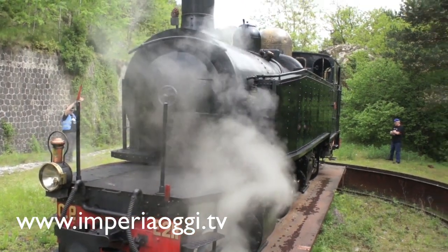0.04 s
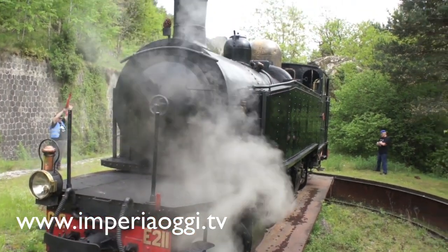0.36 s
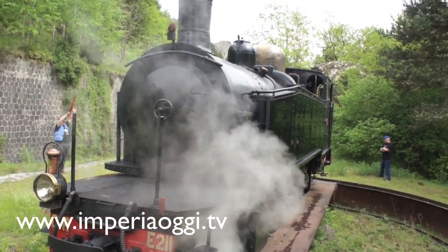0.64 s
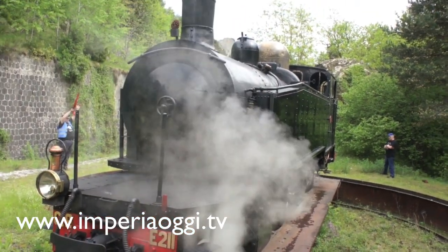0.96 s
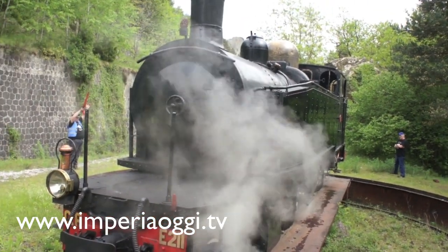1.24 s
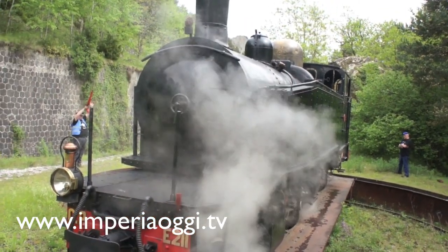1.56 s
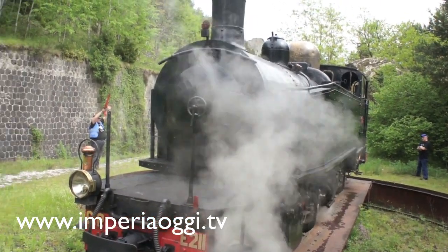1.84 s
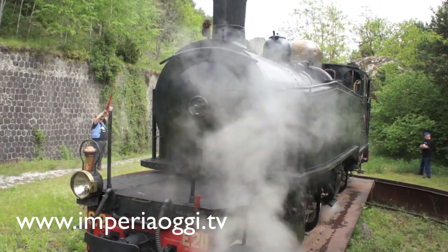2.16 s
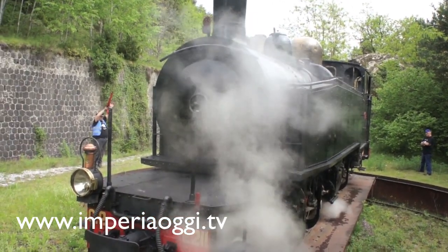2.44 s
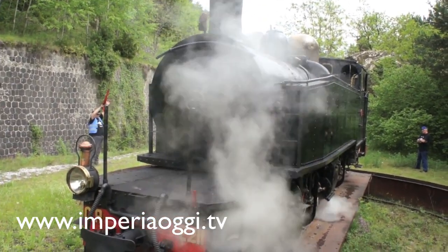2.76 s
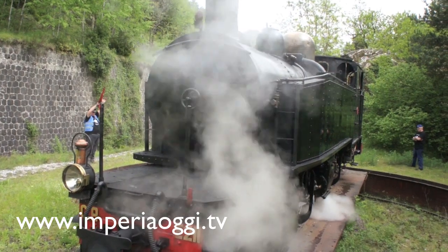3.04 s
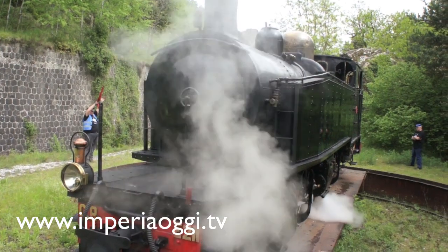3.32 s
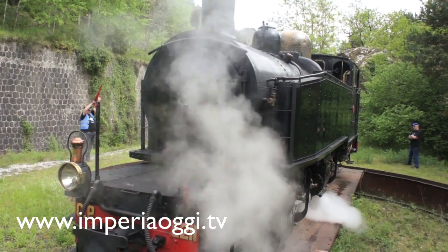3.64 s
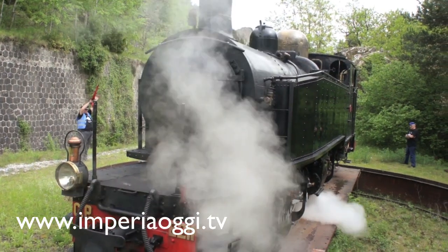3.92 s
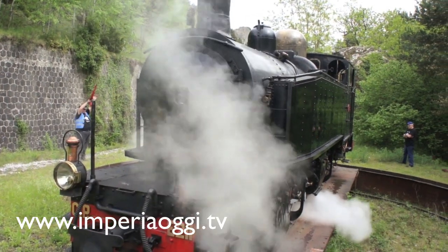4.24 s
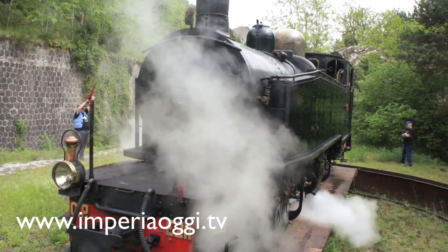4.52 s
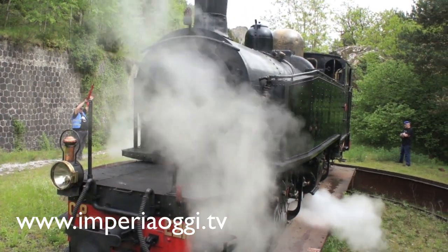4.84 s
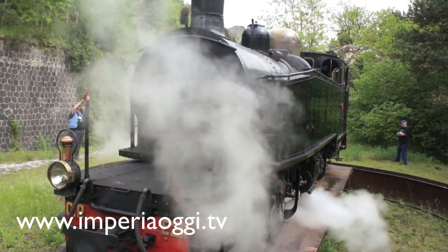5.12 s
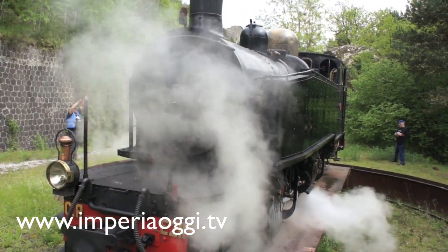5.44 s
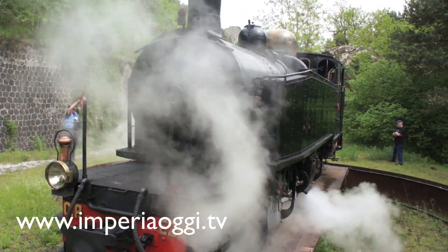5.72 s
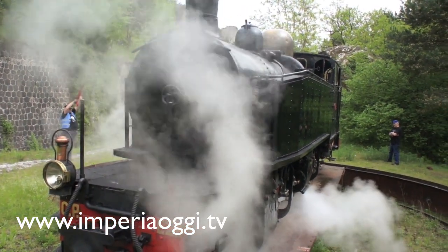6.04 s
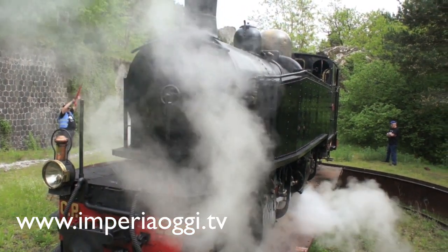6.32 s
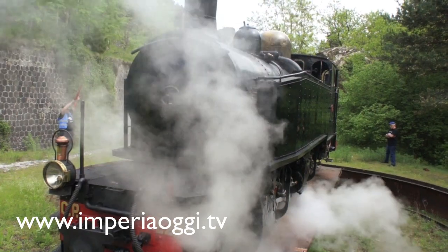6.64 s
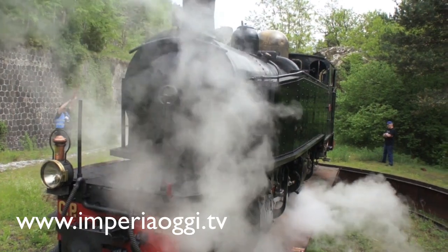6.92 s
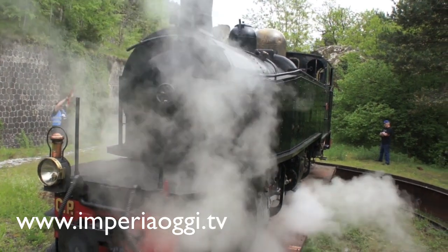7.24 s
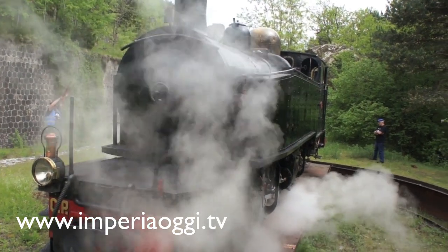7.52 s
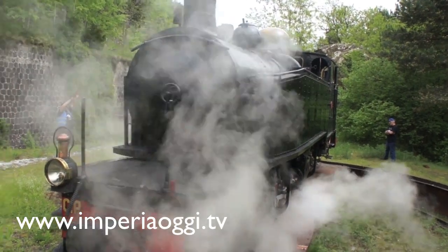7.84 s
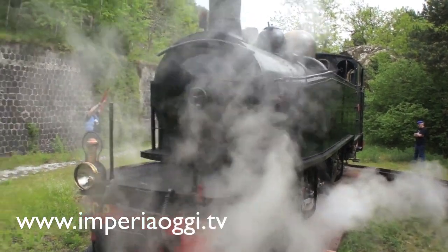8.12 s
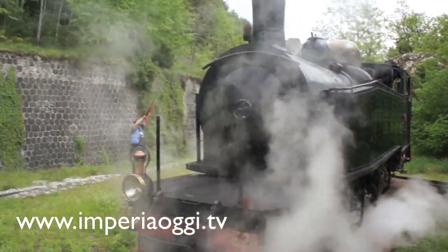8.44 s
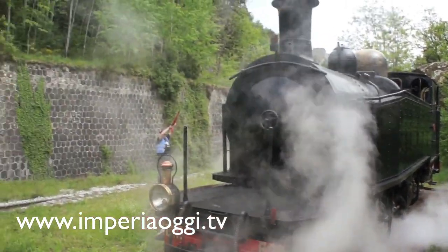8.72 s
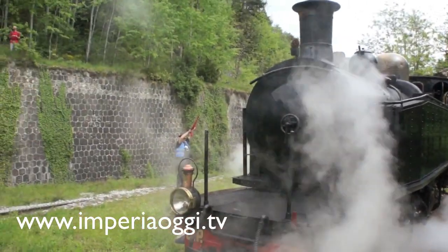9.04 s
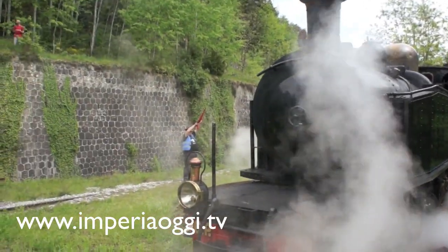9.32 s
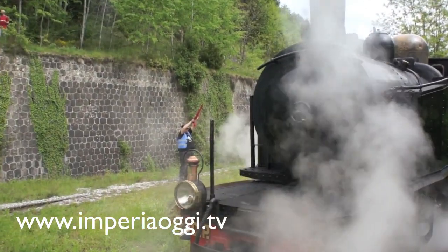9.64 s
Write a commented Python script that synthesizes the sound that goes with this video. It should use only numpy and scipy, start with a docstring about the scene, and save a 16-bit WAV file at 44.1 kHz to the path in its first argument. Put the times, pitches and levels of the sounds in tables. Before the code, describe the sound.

A steam locomotive roars steadily, then releases a loud, uneven hiss of steam that falters, surges again and eases off.

```python
"""A steady roar comes first: the blower in the chimney of a steam locomotive, on a turntable a few metres off.
A drain cock opens and its jet hisses over everything, hollowed by a reflection off the deck that shifts
as the jet swings. The jet falters, there is a low thump, it blows again brighter and then eases off.
While it is strong, the microphones are buffeted and the camera's gain control ducks the roar."""
import sys
import numpy as np
from scipy import signal
from scipy.fft import rfft, irfft, next_fast_len
from scipy.io import wavfile
from scipy.ndimage import uniform_filter1d, map_coordinates

SR = 44100
rng = np.random.default_rng(int(sys.argv[2]) if len(sys.argv) > 2 else 0)


def store_pcm(level_fs):
    """Save levels as 16-bit WAV."""
    pcm = np.round(np.clip(level_fs, -1, 1) * 32767).astype(np.int16)
    wavfile.write(sys.argv[1], SR, np.atleast_2d(pcm).T)


N = 426888
TIME = np.arange(N) / SR


# The jet from a few metres, hiss and sizzle. Each row: frequency in Hz, relative level in dB.
HISS_SPECTRUM = [(150, -42), (550, -38.5), (1100, -23.5), (2000, -14), (2800, -16), (3500, -6.5),
                 (4300, -3), (5300, -1.5), (6100, -2), (6800, 1), (8000, -2.5), (10000, -14.5),
                 (15000, -44)]
SIZZLE_SPECTRUM = [(3000, -47), (5500, -10), (7300, -5), (8500, -1.5), (9700, -3), (10900, -3), (12000, -7),
                   (13500, -12.5), (15500, -27)]
# Resonances around the cock. Each row: centre in Hz, width in Hz, boost or dip in dB.
COCK_MODES = [(372, 26, 4), (577, 160, 16.5), (2110, 240, 1.5), (2670, 260, 1.5), (4500, 270, -2),
              (4800, 300, -1.5)]
# The jet across the microphone pair. Each row: frequency in Hz, left-right likeness from 0 to 1.
JET_LIKENESS = [(300, 0.65), (2000, 1), (4000, .96), (8500, 1), (10800, 0.99), (12000, 0.74), (14000, .5)]

def drain_jet(hiss_db, sizzle_db):
    """Wet steam leaves the cock in an uneven stream: a hiss with a brighter sizzle on top."""
    sputter_db = 0.092 * wobble(16) + 0.34 * wobble(70)  # slugs of condensate
    flow = rush(HISS_SPECTRUM, JET_LIKENESS, patchy_db=0.6)
    hiss = unit(filtered(flow, lambda hz: resonances(COCK_MODES, hz)))
    sizzle = amp(sizzle_db + 0.6 * wobble(20)) * rush(SIZZLE_SPECTRUM, JET_LIKENESS, patchy_db=0.5)
    return amp(hiss_db + sputter_db) * (hiss + sizzle)


# The jet's bounce off the turntable deck. Each row: time in seconds, delay in ms, strength from 0 to 1.
DECK_BOUNCE = [(2.6, .57, .43), (4.1, 0.604, 0.29), (6.05, 0.55, .27), (7.2, 0.51, 0.14), (8.3, 0.4, 0)]

def off_the_deck(x):
    """The direct sound and its slightly later reflection make a slowly sliding comb."""
    delay_ms, strength = curves(DECK_BOUNCE)
    earlier = np.arange(N) - delay_ms * SR / 1000
    deck_tone = [(2000, 1), (7000, 1.5), (12000, -3.5)]  # Hz, dB: the rough deck scatters treble
    mirrored = filtered(x, lambda hz: amp(along(deck_tone, hz)))
    echo = np.array([map_coordinates(side, [earlier]) for side in mirrored])
    return (x + strength * echo) / np.sqrt(1 + strength ** 2)


# The jet, off axis at the microphones. Each row: frequency in Hz, left's lead in radians.
JET_PHASE = [(400, .35), (1800, 0), (9300, 0), (10800, -.3), (12300, -1.1), (14000, -1.3)]
# Its shading between them. Each row: frequency in Hz, left over right in dB.
JET_BALANCE = [(300, .5), (1300, -3), (2300, 1.5), (3400, -2.5), (4400, -1.5), (5400, -2.5), (6200, 0),
               (9200, 1), (10600, 3.5), (11800, 4.8), (13800, 1.5)]

def shaded(x, depth):
    """The camera's body delays and favours one microphone or the other, band by band."""
    bent = filtered(x, lambda hz: np.exp(np.array([[1j], [-1j]]) * along(JET_PHASE, hz) / 2))
    return bent + depth * filtered(bent, lambda hz: panned(along(JET_BALANCE, hz)) - 1)


# The nozzle, near centre, and the pipe, to the right. Each row: centre in Hz, width in Hz, level in dB.
NOZZLE_BANDS = [(4150, 220, -3), (4390, 360, 0)]
PIPE_BANDS = [(2090, 670, -1.5), (3350, 310, 1), (3840, 460, 4)]
# When each sings. Each row: start, end and fade in seconds, level in dB relative to the hiss.
NOZZLE_SPELLS = [(2.28, 3.35, .15, -12), (4.95, 8.55, 0.26, -11), (7.32, 7.48, 0.054, -11),
                 (7.58, 7.72, .05, -13)]
PIPE_SPELLS = [(8.75, 10.5, 0.67, -8)]

def drain_ringing():
    """The jet rings its nozzle; the drain pipe adds a hollow note as the flow eases."""
    nozzle = panned(db=.3) * blown(NOZZLE_BANDS, NOZZLE_SPELLS, flutter_db=1.1)
    pipe = panned(db=-6) * blown(PIPE_BANDS, PIPE_SPELLS, flutter_db=1.5)
    return nozzle + pipe


def blown(modes, spells, flutter_db):
    """Steam blows across narrow resonances and makes them sing hoarsely, in spells that fade in and out."""
    def bands(hz):
        return sum(amp(db) * np.exp(-2 * ((hz - centre) / width) ** 2) for centre, width, db in modes)
    level = sum(amp(db) * np.clip(np.minimum(TIME - start, end - TIME) / fade, 0, 1)
                for start, end, fade, db in spells)
    return level * amp(flutter_db * wobble(16)) * unit(filtered(rng.standard_normal(N), bands))


# The chimney's roar from a few metres. Each row: frequency in Hz, relative level in dB.
ROAR_SPECTRUM = [(15, -52), (25, -21), (86, -17.5), (156, -8), (359, -7), (410, -7.5), (482, -3),
                 (1450, -4.5), (2010, -3.5), (4040, -1.5), (4500, 0), (6920, 0.5), (10100, 0.5),
                 (13900, -7), (15500, -30)]
# The roar across the microphone pair. Each row: frequency in Hz, left-right likeness from 0 to 1.
ROAR_LIKENESS = [(100, 0.82), (1000, 0.92), (4000, 0.92), (6500, 0.98), (9000, 0.78), (11000, 0.4),
                 (14000, 0)]
# Resonances in chimney and smokebox. Each row: centre in Hz, width in Hz, boost in dB.
CHIMNEY_MODES = [(183, 110, 2), (248, 34, 2.5), (367, 28, 5), (473, 68, 2.5), (666, 77, 2.5), (900, 19, 0),
                 (1086, 34, 2.5), (2012, 55, 5.5), (2830, 120, 3), (4570, 100, 1.5), (8200, 780, 1),
                 (10050, 390, 2)]
# Paths to the microphones off boiler and frame. Each row: delay in ms, strength from 0 to 1.
BOILER_BOUNCES = [(1.31, 0.02), (3.55, 0.04), (5.4, 0.08), (11.3, 0.1)]

def blower():
    """A broad, steady roar that rings the chimney and smokebox and glances off the boiler."""
    def paths(hz):
        return 1 + sum(strength * np.exp(-2j * np.pi * hz * ms / 1000) for ms, strength in BOILER_BOUNCES)
    flow = rush(ROAR_SPECTRUM, ROAR_LIKENESS, patchy_db=0.68)
    roar = unit(filtered(flow, lambda hz: resonances(CHIMNEY_MODES, hz) * paths(hz)))
    level_db = -15 + 0.21 * wobble(14)
    return amp(level_db) * roar


# Dull thumps in the engine and brief steam whistles, alike in both microphones. Each row: peak time
# in seconds, level in dB, pitch in Hz, glide in Hz per second, half-length in seconds.
ENGINE_THUMPS = [(.05, -32.5, 217, 0, .05), (7.315, -29, 190, 0, .03), (7.375, -29, 288, 0, 0.02)]
STEAM_WHISTLES = [(.48, -29, 1076, 0, .04), (.7, -31, 1050, 0, .08), (1.985, -29, 1370, -900, .04),
                  (2.1, -32, 2020, 2, .06), (2.47, -28.5, 585, 0, .03), (3.02, -25, 1125, 200, .065)]

def thumps_and_whistles():
    """The engine thumps and the steam whistles faintly, each a short, unsteady tone."""
    thumps = swells(ENGINE_THUMPS, waver_radians=1.0, waver_rate=70)
    whistles = swells(STEAM_WHISTLES, waver_radians=0.5, waver_rate=65)
    return thumps + whistles


def swells(rows, waver_radians, waver_rate):
    """Short tones that swell and fade, their phase wavering."""
    drift = waver_radians * wobble(waver_rate)
    tones = np.zeros(N)
    for peak, db, hz, glide, half_length in rows:
        near = np.abs(TIME - peak) < .3
        t = TIME[near] - peak
        phase = 2 * np.pi * (hz + glide * t / 2) * t + drift[near]
        tones[near] += amp(db) * np.exp(-(t / half_length) ** 2) * np.sin(phase)
    return tones


# Wind right on the microphones. Each row: frequency in Hz, relative level in dB.
BUFFET_SPECTRUM = [(8, -5), (22, -14), (50, -17), (120, -34), (400, -70)]

def wind(hiss_db):
    """A low buffeting that grows steeply with the jet."""
    level_db = -36.5 + 1.8 * hiss_db + 1.2 * wobble(9)
    return amp(level_db) * rush(BUFFET_SPECTRUM, likeness=[(30, 0.98)], patchy_db=0)


def rush(spectrum, likeness, patchy_db):
    """Turbulent stereo noise of rms 1; eddies give it patches of random gain."""
    def mid_and_side(hz):
        angle = np.arccos(np.clip(along(likeness, hz), -1, 1)) / 2
        return amp(along(spectrum, hz)) * [np.cos(angle), np.sin(angle)]
    cells = signal.stft(rng.standard_normal((2, N)), nperseg=512)[2]
    eddies = uniform_filter1d(rng.standard_normal(cells.shape[1:]), size=9, axis=0)  # across frequency
    eddies = uniform_filter1d(eddies, size=16, axis=1)  # across time
    pair = signal.istft(cells * amp(patchy_db * unit(eddies)), nperseg=512)[1][:, :N]
    mid, side = filtered(pair, mid_and_side)
    return unit(np.array([mid + side, mid - side]))


def amp(db):
    """Decibels to gain."""
    return 10 ** (np.asarray(db) / 20)


def unit(x):
    """x at rms 1."""
    return x / np.sqrt(np.mean(x ** 2) + 1e-20)


def along(points, hz):
    """(Hz, value) points read on a log axis."""
    freqs, values = np.transpose(points)
    return np.interp(np.log(hz + 1), np.log(freqs + 1), values)


def curves(rows):
    """One value per sample for each column after the time."""
    seconds, *columns = np.transpose(rows)
    return [np.interp(TIME, seconds, column) for column in columns]


def wobble(rate):
    """A smooth random curve, rate knots a second."""
    knots = rng.standard_normal(int(N * rate / SR) + 4)
    steps = np.arange(0, len(knots) - 1, 1 / 8)
    return np.interp(TIME * rate, steps, map_coordinates(knots, [steps]))


def filtered(x, response):
    """x times a response of frequency."""
    size = next_fast_len(N + SR // 2)
    return irfft(rfft(x, size) * response(np.fft.rfftfreq(size, 1 / SR)), size)[..., :N]


def resonances(modes, hz):
    """Gain of (Hz, width, dB) bumps on a flat response."""
    return amp(sum(db / (1 + (2 * (hz - centre) / width) ** 2) for centre, width, db in modes))


def panned(db):
    """Left and right gains for a left-right difference."""
    return amp(np.array([[1], [-1]]) * db / 2)


# The jet at the microphones, from slight leak to full flow.
# Each row: time in seconds, hiss in dB, sizzle in dB relative to the hiss.
JET_FLOW = [(2.25, -27, -5), (2.56, -11, -3.5), (3.45, -7, 1.5), (4.1, -4, -1.5), (4.9, -3.5, -4),
            (5.25, -4.9, 1), (6.2, -4, 3), (6.71, -6.5, -1.2), (6.8, -10, -1.4), (7.05, -10.5, 0),
            (7.33, -14, -1.5), (7.5, -6.5, 3.5), (7.6, -8.5, 3), (7.9, -6, 1.5), (8.15, -6.5, 4),
            (8.66, -2, 2.5), (9.15, -7.2, -4.5), (9.68, -13, -4)]
# The camera's aim. Each row: time in seconds, engine's left over right in dB, depth of the jet's shading.
CAMERA_AIM = [(0, -.2, 1.7), (2.3, -1, 1.3), (4.5, -1.1, .7), (5.8, -0.8, 0.54), (8.3, -.8, 0.94),
              (9.1, -2, 2.2)]

def scene():
    """The engine, placed by the camera's aim; the jet's strength drives its ringing and the buffeting."""
    hiss_db, sizzle_db = curves(JET_FLOW)
    bearing_db, shading = curves(CAMERA_AIM)
    jet = shaded(off_the_deck(drain_jet(hiss_db, sizzle_db)), shading)
    ringing = amp(hiss_db) * drain_ringing()
    engine = jet + ringing + thumps_and_whistles() + blower()
    return engine * panned(bearing_db) + wind(hiss_db)


def gain_control(x, ceiling_db=-13, attack_s=0.0096, release_s=0.43, block=256):
    """Power above the ceiling turns the gain down quickly; it creeps back when the sound eases."""
    power = np.abs(uniform_filter1d(np.mean(x ** 2, axis=0), size=block))[::block]
    cut_db = [0]
    for excess_db in np.maximum(10 * np.log10(power + 1e-12) - ceiling_db, 0):
        lag_s = attack_s if excess_db > cut_db[-1] else release_s
        cut_db.append(excess_db + (cut_db[-1] - excess_db) * np.exp(-block / SR / lag_s))
    return x * amp(-np.interp(np.arange(N) / block, np.arange(len(cut_db)), cut_db))


def record(dry):
    """The camera rides its gain, rounds off the highest peaks and keeps nothing above its band limit."""
    held = gain_control(dry)
    rounded = held / (1 + np.abs(held / .95) ** 12) ** (1 / 12)
    return filtered(rounded, lambda hz: hz < 15800)


dry = scene()
out = record(dry)
store_pcm(out)
```